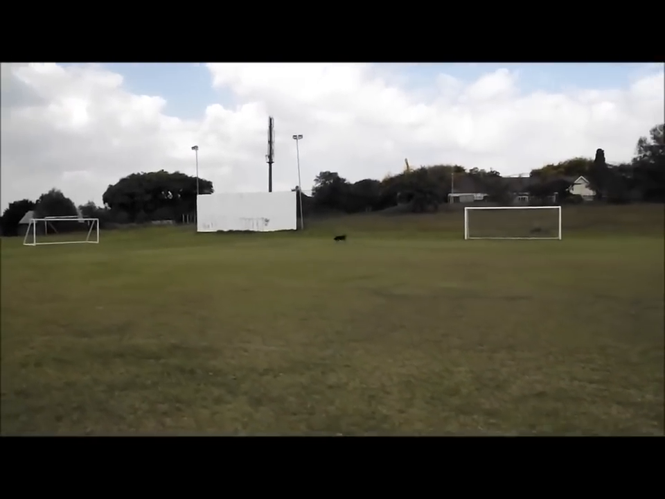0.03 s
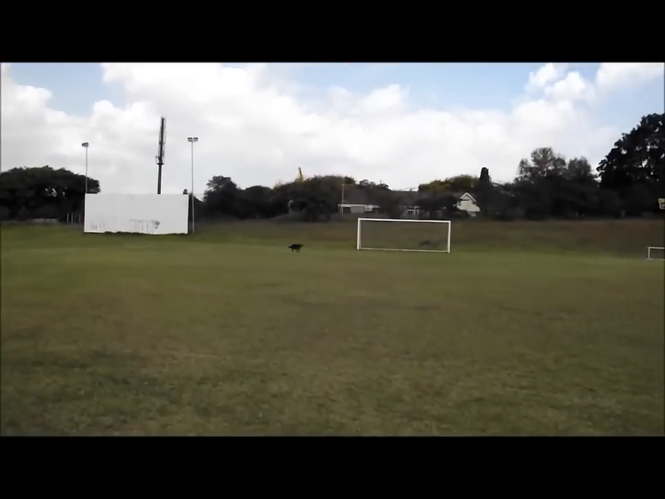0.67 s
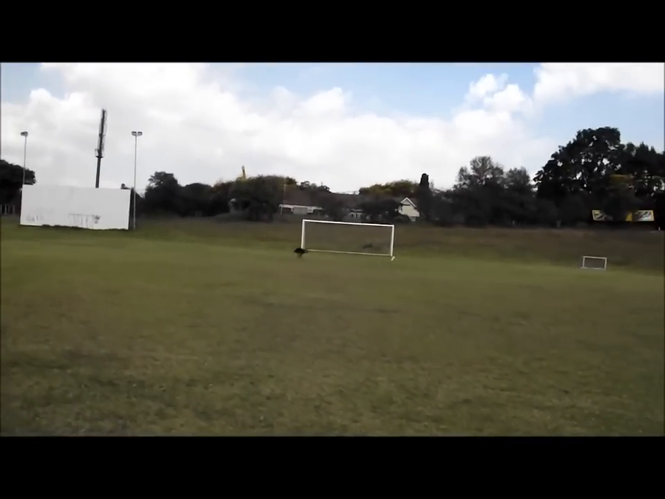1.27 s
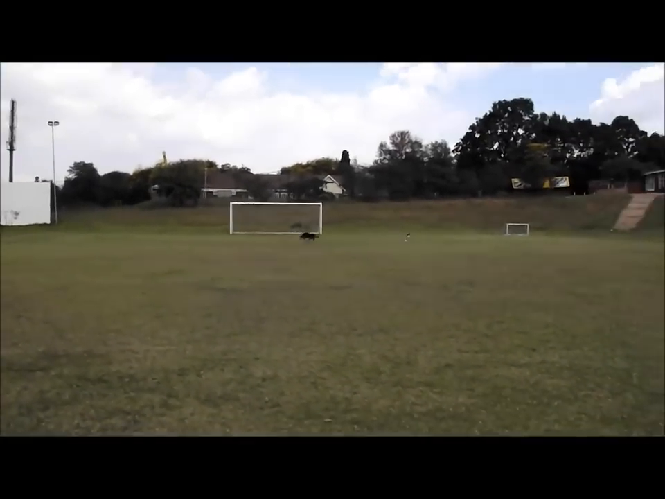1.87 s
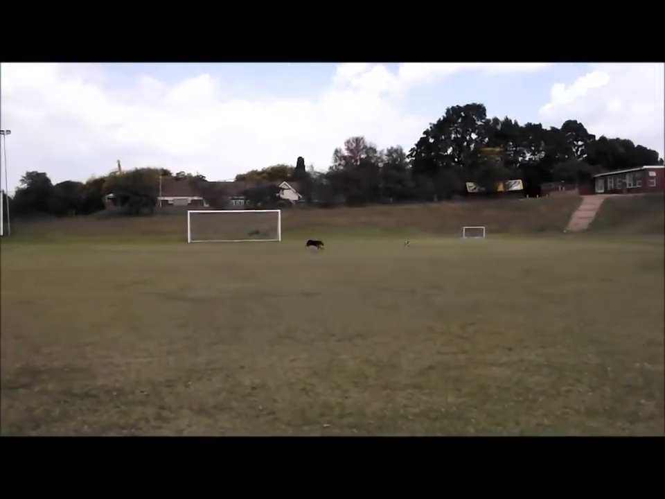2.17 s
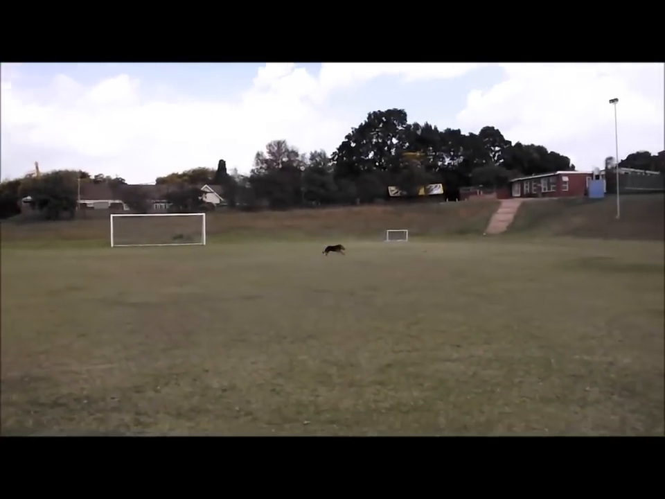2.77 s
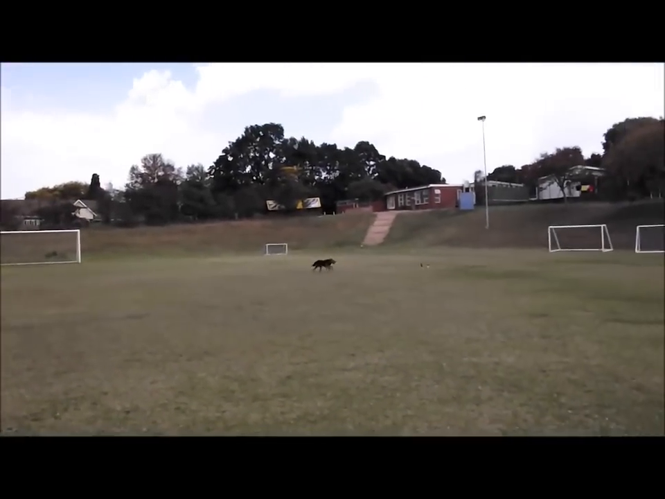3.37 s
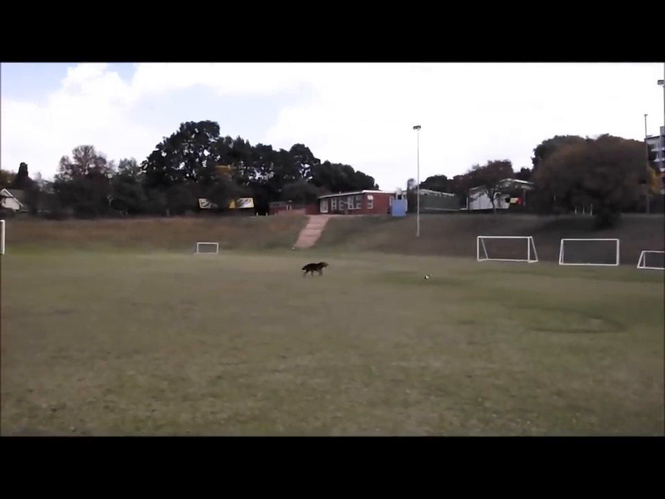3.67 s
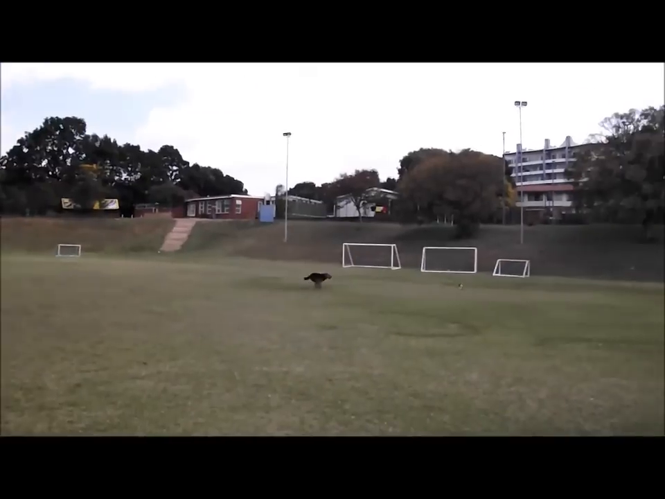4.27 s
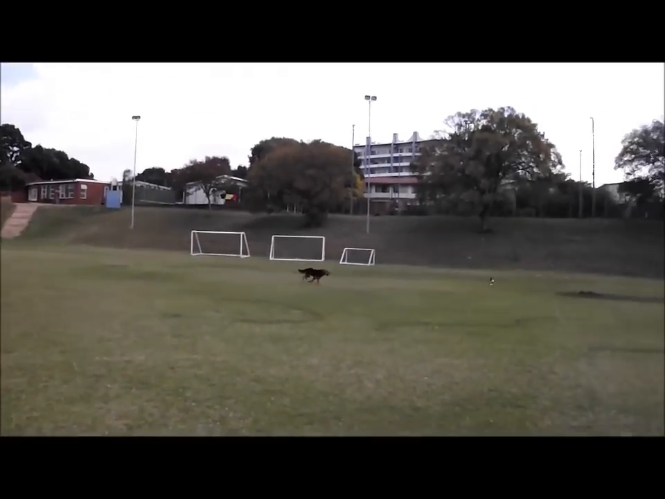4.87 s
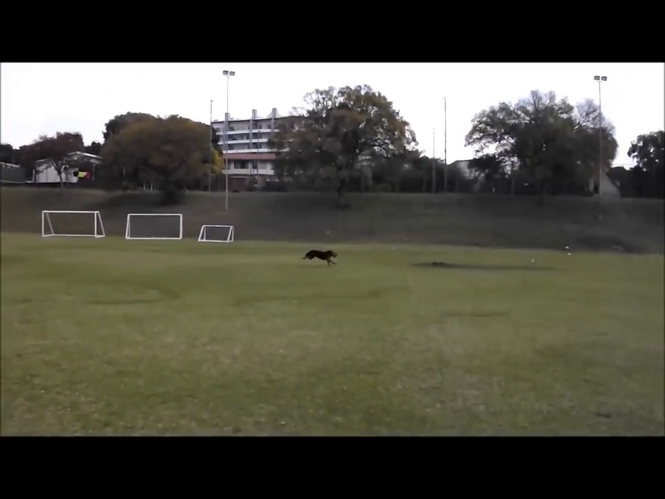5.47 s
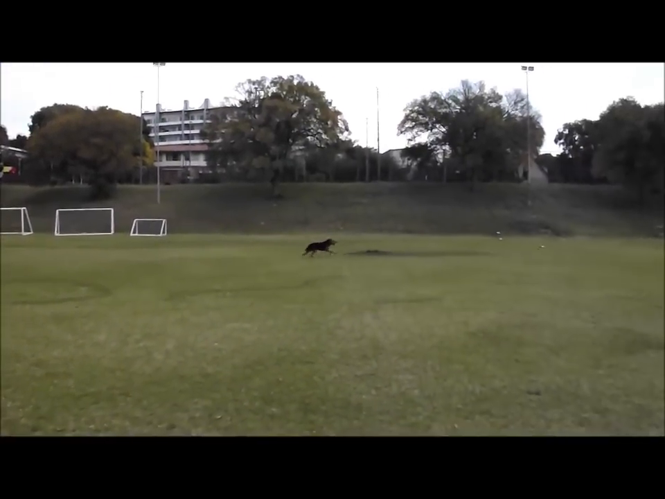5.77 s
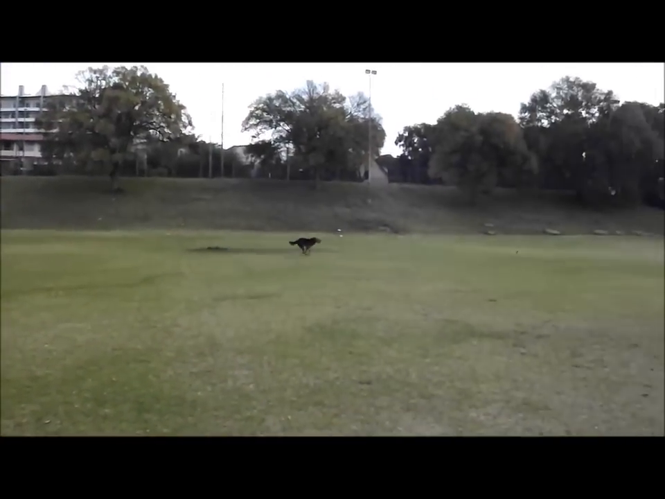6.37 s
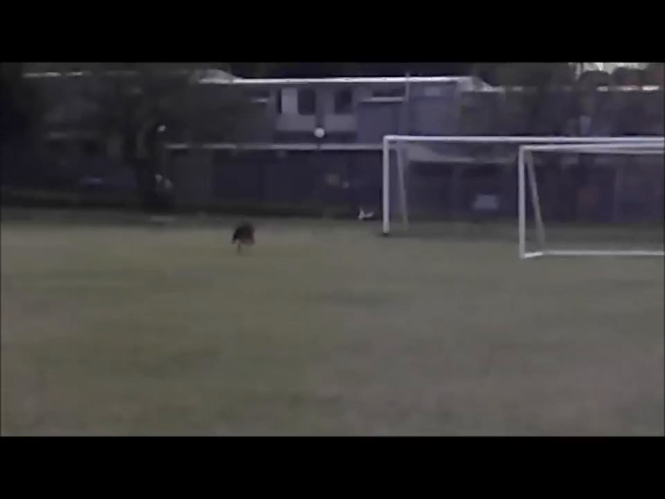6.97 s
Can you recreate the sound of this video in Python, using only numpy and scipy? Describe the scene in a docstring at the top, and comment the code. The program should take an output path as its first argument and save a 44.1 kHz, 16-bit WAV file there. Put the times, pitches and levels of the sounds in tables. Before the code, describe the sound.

Birds give shrill alarm calls across an open field, each a rising, stuttering rasp that snaps into a short, clean, falling note with a faint echo. One call comes at about 0.2 seconds, then two weak ones, then a quick run from 1.3 to 2.8 seconds. After a lull with one softer call, the scolding resumes at 3.7 seconds and continues, sometimes overlapping, to the end at about 7 seconds.

Wind rumbles on the microphone from the start, puffs hardest between 2 and 2.5 seconds, and dies down by about 4. Fingers knock on the camera between 0.7 and 4.1 seconds, among a few small dry ticks. The sound cuts out for an instant near 2.8 seconds. From about 3.5 seconds a distant engine hums low, wavering and throbbing. Soft air hiss and a very faint, high electronic whine lie underneath.

```python
"""An open playing field, where crowned lapwings scold a running dog (the dog is not heard).
The two sides of a bird's voice box clash in a rising, stuttering rasp, then lock into a short,
clean, falling note. Wind buffets the microphone, the air hisses and the camera's electronics whine.
Fingers knock on the camera, small ticks sound, and from about halfway a far engine hums."""
import sys
import numpy as np
from scipy import signal
from scipy.fft import rfft, irfft, next_fast_len
from scipy.io import wavfile
from scipy.ndimage import uniform_filter1d, map_coordinates

SR = 44100
rng = np.random.default_rng(int(sys.argv[2]) if len(sys.argv) > 2 else 0)


def bounce(signal):
    """Save signal as a 16-bit WAV file at the path given by the first command-line argument."""
    frames = np.transpose(np.atleast_2d(signal))
    limited = np.clip(frames, -1, 1)
    pcm = np.round(limited * 32767).astype(np.int16)
    wavfile.write(sys.argv[1], SR, pcm)


N = 314433
TIME = np.arange(N) / SR


def from_db(db):
    """Turn decibels into a number to multiply by."""
    return 10 ** (np.asarray(db) / 20)


def unit_power(x):
    """Scale a sound to an average power of 1."""
    return x / np.sqrt(np.mean(x ** 2) + 1e-20)


def in_time(rows):
    """Join rows that start with a time into one curve per remaining column."""
    s, *columns = np.transpose(rows)
    return [np.interp(TIME, s, c) for c in columns]


def coloured(x, spectrum):
    """Shape a sound's lows and highs along (Hz, dB) points."""
    hz, db = np.transpose(spectrum)
    size = next_fast_len(len(x) + 512)
    bins = np.maximum(np.arange(size // 2 + 1) * SR / size, 1)
    return irfft(rfft(x, size) * from_db(np.interp(np.log(bins), np.log(hz), db)), size)[:len(x)]


def wander(rate, size):
    """Drift around zero, heading for a new random value `rate` times a second."""
    knots = rng.standard_normal(4096)
    return np.interp(np.arange(size) * rate / SR, np.arange(len(knots)), knots)


def noise(spectrum):
    """Noise of power 1, shaped along (Hz, dB) points."""
    return unit_power(coloured(rng.standard_normal(N), spectrum))


def evened(x, window_s):
    """Even out the loudness, holding the power near 1."""
    return x / np.sqrt(np.abs(uniform_filter1d(x ** 2, max(int(window_s * SR), 2))) + 1e-9)


def ring(clicks, hz, t60):
    """Each click starts a tone that fades by 60 dB in t60 seconds."""
    r, w = from_db(-60 / (t60 * SR)), 2 * np.pi * hz / SR
    return signal.lfilter([0, np.sin(w)], [1, -2 * r * np.cos(w), r * r], clicks + 1e-18)


def die_away(clicks, t60):
    """A loudness curve that jumps at each click and fades by 60 dB in t60 seconds."""
    return signal.lfilter([1], [1, -from_db(-60 / (t60 * SR))], clicks + 1e-18)


def ramp(x):
    """Smooth step from 0 to 1."""
    return np.sin(np.pi / 2 * np.clip(x, 0, 1)) ** 2


def harmonics(phase, first, last):
    """A buzz of equally strong harmonics, staggered so their peaks do not pile up."""
    return sum(np.cos(k * phase + k * k) for k in range(first, last + 1))


# The wind dying down. Each row: time in seconds, relative rumble and flutter levels in dB.
WIND_LEVELS = [(0.0, -21.5, -31.5), (0.06, -14, -26), (0.08, -20.5, -27.5), (0.67, -19, -29),
               (0.69, -13, -21.5), (0.83, -21.5, -23.5), (1.31, -17.5, -36.5), (1.67, -20, -26.5),
               (1.97, -19.5, -33.5), (2.06, -14, -23), (2.66, -19, -32.5), (2.8, -28.5, -41),
               (3.22, -26.5, -39), (3.26, -16.5, -40), (3.45, -25.5, -40.5), (4.31, -37.5, -43),
               (7.09, -34, -42), (7.13, -41, -45)]
# Single puffs of air. Each row: time of the peak in seconds, level in dB.
PUFFS = [(2.05, -18), (2.225, -12.5), (2.34, -7.5), (2.46, -14), (3.266, -23)]
# The tone of rumble, flutter and puffs. Each row: frequency in Hz, relative level in dB.
RUMBLE_TONE = [(10,-10.5),(20,1.5),(35,3),(55,0.5),(80,-2.5),(110,-21),(160,-45),(300,-77)]
FLUTTER_TONE = [(50,-44),(90,-1),(120,0),(160,-8.5),(220,-14),(320,-29.5),(600,-36.5),(1500,-70)]
PUFF_TONE = [(15, 0), (40, 13), (70, 0.5), (130, -5), (250, -22.5), (600, -34), (1500, -61)]

def wind(eddy_db=2.0, eddies_per_s=14, puff_half_width_s=0.016):
    """Swirls of air rumble on the microphone, with a faster flutter and a few single puffs."""
    rumble_db, flutter_db = in_time(WIND_LEVELS)
    eddies = from_db(eddy_db * wander(eddies_per_s, N))
    rumble = from_db(rumble_db + 1.6) * evened(noise(RUMBLE_TONE), 0.117)
    flutter = from_db(flutter_db + 1.0) * evened(noise(FLUTTER_TONE), 0.098)
    puffs = sum(from_db(db) * np.exp(-((TIME - s) / puff_half_width_s) ** 2) for s, db in PUFFS)
    return eddies * (rumble + flutter) + puffs * evened(noise(PUFF_TONE), 0.038)


# How loud the air is. Each row: time in seconds, level in dB.
HISS_LEVEL = [(0,-38.5),(1.0,-41),(2.4,-41),(2.9,-40),(3.5,-41.5),(4.2,-42),(4.7,-45.5),(5.1,-44),(5.8,-41),(6.3,-41.5),(7.13,-42)]
# The tone of the air. Each row: frequency in Hz, relative level in dB.
HISS_TONE = [(100,-3),(300,0.5),(450,0),(700,2),(1100,2.5),(1700,-2.5),(2700,-1),(3400,-1),(4200,-2),(5000,-19),(6000,-19),(9000,-23),(16000,-31.5)]

def air_hiss():
    """The open air hisses softly."""
    return noise(HISS_TONE) * from_db(in_time(HISS_LEVEL)[0])


# The tones in the whine. Each row: frequency in Hz, relative level in dB.
WHINE_TONES = [(5200,-61.5),(6933,-72),(8667,-63),(10400,-60.5),(12133,-66.5),(13867,-61.5),(15000,-63.5),(15600,-62)]
# How the whine fades and returns. Each row: time in seconds, relative level in dB.
WHINE_SWELL = [(0,6.5),(2.6,5.5),(3.2,3),(4.2,-4),(4.8,-14),(5.4,0),(6.2,-3.5),(7.13,-4)]

def camera_whine():
    """The camera's electronics give off thin, high tones of steady pitch."""
    tones = sum(from_db(db) * np.sqrt(2) * np.sin(2 * np.pi * hz * TIME) for hz, db in WHINE_TONES)
    return tones * from_db(in_time(WHINE_SWELL)[0] - 6)


def softness(rise, growl_db):
    """How gently a call opens, 0 to 1: a big climb with little growl is gentlest."""
    return np.clip(rise / 0.16, 0, 1) * np.clip(growl_db / -22, 0, 1)


# The bird's throat as a call opens. Each row: frequency in Hz, relative level in dB.
OPENING_THROAT = [(1100, -34), (1700, -9), (2200, 0.5), (2700, 1), (3500, -5), (4300, -9.5), (5200, -25),
                  (8000, -46)]

def lead_in(row, early_s=0.014, lead_db=-14, overlap=0.64, jitter=0.0072, sag=0.0501):
    """Before the rasp takes hold, the voice box buzzes softly an octave down and glides up."""
    break_at, rasp_s, _, note_hz, rise, rasp_db, _, _, _, growl_db, _ = row
    start = break_at - rasp_s
    span = np.flatnonzero((TIME > start - early_s) & (TIME < start + overlap * rasp_s))
    since = TIME[span] - start
    climb = 1 - rise * (1 - np.clip(since / rasp_s, 0, 1)) ** np.sqrt(2)
    climb += sag * np.minimum(since / early_s, 0)
    pitch = note_hz / 2 * climb * (1 + jitter * wander(520, len(span)))
    buzz = unit_power(coloured(harmonics(2 * np.pi * np.cumsum(pitch) / SR, 2, 12), OPENING_THROAT))
    swell = np.sin(np.pi * np.linspace(0, 1, len(span))) ** 1.6
    out = np.zeros(N)
    out[span] = buzz * softness(rise, growl_db) * from_db(rasp_db + lead_db) * swell
    return out


def stutter(from_break, rasp_s, hoarse_db, speed_up=0.17, gap_share=0.43, settle_s=0.0032):
    """Depth of the gaps in the voice: uneven bursts speed up, then merge just after the break."""
    size = len(from_break)
    before, after = np.maximum(-from_break, 0), np.maximum(from_break, 0)
    last_period_s = 0.0055 + 0.036 * rasp_s
    beats = np.log1p(speed_up * before / last_period_s) / speed_up - after / last_period_s
    beats += 0.146 * wander(91.25, size)
    unsettled = np.exp(-after / (settle_s * from_db(hoarse_db)))
    depth = unsettled * np.clip(1 + 0.267 * wander(99, size), 0, 1.2)
    return depth * ramp(1 - np.abs((beats + 0.34) % 1 - .5) / gap_share)


def throat(third_db, treble_db, growl_db):
    """How the throat shapes the clean and the rough part of a call, as (Hz, dB) points."""
    high_db = -9 + 1.1 * treble_db
    clean = [(700, -66), (1400, max(-28, growl_db - 7)), (1950, growl_db / 3), (2300, 0.31),
             (2950, 2.7), (3700, third_db), (4350, third_db), (5000, treble_db), (5600, treble_db - 8),
             (6100, high_db - 2.5), (6800, high_db), (8200, high_db - 14), (15000, high_db - 33)]
    rough = [(1000, -42), (1500, growl_db - 0.5), (2100, growl_db), (2700, 0), (3100, 0.5), (3450, 6),
             (3850, 1), (4400, third_db - 4.5), (5100, treble_db - 1), (6000, high_db - 10.5),
             (7000, high_db - 0.5), (9000, high_db - 20), (15000, high_db - 13)]
    return clean, rough


def clash(note_hz, pitch, in_rasp, hoarse_db, rough_throat, beat_share=0.63, slip=0.065):
    """The voice box's second side beats below the pitch, slipping more as the effort grows."""
    size = len(pitch)
    beat_hz = note_hz * (beat_share + slip * in_rasp * wander(901.6, size))
    beat = np.cos(2 * np.pi * np.cumsum(beat_hz) / SR)
    grating = unit_power(beat * harmonics(2 * np.pi * note_hz * TIME[:size], 1, 7))
    breath = from_db(hoarse_db - 4.5) * rng.standard_normal(size)
    rough = coloured(from_db(1) * grating + breath, rough_throat)
    read_at = np.cumsum((pitch / note_hz) ** 0.9)   # makes the roughness glide with the pitch
    return evened(map_coordinates(rough, [read_at], mode="mirror"), 0.023)


def call(row, fall_share=0.155, gap_sag=0.085, gap_db=-7.5, release_s=0.014):
    """One call: the two sides of the voice box clash in bursts, then lock into one clean tone."""
    break_at, rasp_s, note_s, note_hz, rise, rasp_db, note_db, third_db, treble_db, growl_db, hoarse_db \
        = row
    size = SR // 3
    since = TIME[:size]
    from_break = since - rasp_s
    in_rasp = np.clip(since / rasp_s, 0, 1)   # progress from 0 to 1
    in_note = np.clip(from_break / note_s, 0, 1)
    rasping = 1 - ramp(from_break / 0.00067 + .5)   # 1 in the rasp, 0 in the note
    gap = stutter(from_break, rasp_s, hoarse_db)
    # pitch climbs with the pressure, sags in each gap, then falls; clear notes hold it longer
    climb = 1 - rise * (1 - in_rasp) ** np.sqrt(2)
    fall = 1 - fall_share * in_note ** (1.22 + 0.04 * abs(growl_db))
    jitter = (0.0084 + 0.019 * rasping) * from_db(hoarse_db / 2) * wander(594.5, size)
    pitch = note_hz * climb * fall * (1 - gap_sag * gap + jitter)
    clean_throat, rough_throat = throat(third_db, treble_db, growl_db)
    tone = harmonics(2 * np.pi * np.cumsum(pitch) / SR, 1, 11)
    clean = evened(coloured(tone, clean_throat), 0.0022)
    # roughness grows through the rasp and drops back in the note
    rough = clash(note_hz, pitch, in_rasp, hoarse_db, rough_throat)
    rough *= from_db(4 + hoarse_db / 2 - 7 * (1.5 - in_rasp))
    rough *= rasping + (1 - rasping) * from_db(hoarse_db - 14) * (1 - in_note / 2)
    voice = evened(clean * (1 - 0.75 * gap) + rough, 0.0024)
    # weak pressure at both ends dulls the sound
    slack = np.clip(1.3 * (1 - in_rasp) + .3 * rasping + in_note ** 4, 0, 1)
    mellow = coloured(voice, [(3300, 0), (4200, -7), (6500, -14), (12000, -28)])
    voice += slack * (mellow - voice)
    swell_db = rasp_db + 3.5 + 13 * np.sqrt(abs(rise)) * np.minimum(2 * in_rasp - 1.5, .3)
    fade_db = note_db - 5 * np.abs(in_note - 0.26)
    level_db = rasping * swell_db + (1 - rasping) * fade_db + gap_db * gap
    attack_s = 0.02 + 0.22 * rasp_s * softness(rise, growl_db)
    edges = ramp(since / attack_s) ** .5 * ramp((note_s - from_break) / release_s) ** 0.71
    return voice * from_db(level_db) * edges


# The calls. Each row: time of the break from rasp to note, rasp length and note length in seconds,
# note pitch in Hz, share of that pitch the rasp climbs, then relative levels in dB for the rasp,
# the note, the third harmonic, the treble, the low growl and the hoarseness.
CALLS = [(0.234, 0.18, 0.035, 1284, 0.22, -18, -13, -5.5, -20, -28, -2),
         (0.573, 0.042, 0.024, 1053, 0.12, -36.5, -35, 1, -18, -10, -10),
         (1.126, 0.058, 0.023, 1075, 0.16, -34, -31, -1, -8.5, -12, -8),
         (1.349, 0.071, 0.038, 1308, 0.24, -20.5, -18.5, 4, -1, -24, -2),
         (1.471, 0.11, 0.034, 1234, 0.19, -27.5, -28, 1, -8.5, -19, 5.5),
         (1.566, 0.065, 0.037, 1375, 0.23, -21, -16, 3, -2.5, -21, 0),
         (1.758, 0.064, 0.041, 1402, 0.33, -18, -15.5, 1, -2, -25, 1),
         (1.94, 0.049, 0.042, 1447, 0.19, -20.5, -16.5, 1, 0, -30, -2.5),
         (2.088, 0.056, 0.037, 1446, 0.19, -18.5, -15, 1, -0.5, -34, -2.5),
         (2.254, 0.059, 0.041, 1442, 0.19, -19.5, -16.5, 1.5, 1, -27, 3),
         (2.433, 0.065, 0.037, 1474, 0.22, -17.5, -12.5, 2, 0.5, -42, -3),
         (2.614, 0.067, 0.039, 1454, 0.17, -18.5, -14, 1.5, 0, -19.5, 1.5),
         (2.81, 0.071, 0.074, 1464, 0.26, -16, -15, -2, -4.5, -26, 1),
         (3.044, 0.16, 0.033, 1212, 0.18, -31.5, -25.5, 0, -19, -17.5, 1),
         (3.684, 0.095, 0.017, 1263, 0.1, -31, -34, 4, -14, -8, -6),
         (3.743, 0.067, 0.032, 1447, 0.19, -16, -12, -6.5, -11, -27, 5.5),
         (3.838, 0.12, 0.034, 1260, 0.14, -18.5, -10.5, 1, -13, -33, -5),
         (3.958, 0.079, 0.037, 1440, 0.2, -15, -12.5, -2, -7, -24, -1.5),
         (4.102, 0.095, 0.013, 1244, 0.13, -31, -34, 1, -25, -5, -10.5),
         (4.181, 0.082, 0.038, 1414, 0.18, -13.5, -12, -0.5, -8, -22.5, 0.5),
         (4.223, 0.026, 0.035, 1087, 0.05, -22, -19.5, -2, -32, -27, -8),
         (4.362, 0.066, 0.022, 1194, 0.02, -13.5, -15.5, -4.5, -22.5, -28, -5),
         (4.452, 0.071, 0.036, 1484, 0.2, -17.5, -14.5, -3.5, -10.5, -23, 1),
         (4.49, 0.11, 0.025, 1261, 0.14, -18, -12.5, -10, -18, -24, -15),
         (4.644, 0.065, 0.033, 1355, 0.03, -15.5, -8, -13.5, -15.5, -18.5, -5),
         (4.858, 0.1, 0.033, 1385, 0.26, -15, -12.5, -6.5, -12, -15, -5),
         (5.024, 0.07, 0.034, 1370, 0.38, -13.5, -12.5, -5.5, -12.5, -15, -8),
         (5.225, 0.09, 0.036, 1412, 0.26, -15, -11.5, 3, -7, -8.5, -2.5),
         (5.441, 0.1, 0.032, 1420, 0.24, -14, -13, 2, -5, -10.5, 0),
         (5.726, 0.15, 0.033, 1424, 0.29, -15, -12.5, -1, -5, -13.5, -1),
         (5.969, 0.11, 0.037, 1420, 0.35, -21.5, -14.5, -8.5, -14.5, -7.5, 1),
         (6.039, 0.048, 0.038, 1067, 0.14, -28.5, -25, -18, -24, -5.5, -17),
         (6.199, 0.088, 0.035, 1387, 0.19, -17, -13.5, 2, -10.5, -14, 0.5),
         (6.458, 0.116, 0.034, 1395, 0.24, -19, -17, -5, -6, -7, 1),
         (6.552, 0.079, 0.037, 1335, 0.16, -21.5, -19.5, -1.5, -10.5, -23, 5),
         (6.687, 0.11, 0.039, 1380, 0.41, -18.5, -11, -4.5, -14, -7.5, -13),
         (6.873, 0.085, 0.032, 1370, 0.27, -22.5, -19.5, -2, -9, -8.5, 3),
         (6.998, 0.11, 0.022, 1430, 0.24, -19.5, -11.5, -3, -7, -13.5, -7),
         (7.073, 0.086, 0.039, 1509, 0.26, -15.5, -11, 1, -6, -45, -13),
         (7.15, 0.082, 0.026, 1400, 0.14, -17.5, -15, 4, -11, -31, 2)]

def lapwings():
    """The birds scold, each call with its lead-in."""
    out = np.zeros(N + SR)
    for row in CALLS:
        sound = call(row)
        start = max(int((row[0] - row[1]) * SR), 0)
        out[start:start + len(sound)] += sound
        out[:N] += lead_in(row)
    return out[:N]


def field_echo(x, echo_db=-28, build_up_s=0.092, t60=1.4):
    """Banks, trees and buildings scatter a faint, dull echo."""
    t = TIME[:SR]
    scatter = rng.standard_normal(SR) * from_db(-60 * t / t60) * ramp(t / build_up_s)
    echo = signal.fftconvolve(x, scatter / np.linalg.norm(scatter))[:N]
    return from_db(echo_db) * coloured(echo, [(3000, 3.5), (4500, 0.5), (8000, -11)])


# Small dry ticks. Each row: start in seconds, relative level in dB.
DRY_TICKS = [(2.108,-12),(2.344,-9.5),(2.46,-9.5),(2.803,-32),(3.172,-31),(4.848,-15)]

def ticks(t60=0.0066, gain_db=-8, snap_db=-16):
    """Short bright ticks: a few on their own, and a snap as each call breaks into its note."""
    snaps = [(row[0], row[6] + snap_db) for row in CALLS]
    clicks = np.zeros(N + SR)
    for s, db in DRY_TICKS + snaps:
        clicks[round(s * SR)] = from_db(db + gain_db)
    return die_away(clicks[:N], t60) * noise([(300, -2.5), (3500, -5), (7000, -9.5), (16000, -20)])


# Finger knocks. Each row: start in seconds, relative level in dB, hardness of the contact in dB.
FINGER_KNOCKS = [(0.693, -15.5, -13), (1.476, -5, -13), (1.591, -28, -3), (1.74, -14.5, -14),
                 (1.855, -8.5, -12.5), (2.588, -6, -19.5), (2.883, -26, -25), (3.075, -26, -13),
                 (3.25, -24, -28), (3.372, -25.5, -14), (4.063, -6, -15)]
# The camera body's tones. Each row: frequency in Hz, relative level in dB, seconds to fade by 60 dB.
BODY_TONES = [(708,-18,0.15),(824,-5.5,0.087),(1030,2,0.053),(1263,-2.5,0.055),(1605,-11,0.035),(930,0.5,0.013),(2560,-8,0.0051),(3000,-8.5,0.032),(4950,-8.5,0.012)]

def knocks(low_cut_hz=480, body_db=-2.0, bounce_s=0.00351, bounce_db=-11, crack_t60=0.062):
    """Each knock and its small rebound ring the camera body; hard contacts add a crack."""
    body, cracks = np.zeros(N), np.zeros(N)
    s, db, hard_db = np.transpose(FINGER_KNOCKS)
    at = np.round(s * SR).astype(int)
    for k, (hz, tone_db, t60) in enumerate(BODY_TONES):
        clicks = np.zeros(N)
        clicks[at] = from_db(db + tone_db + body_db + rng.normal(0, 1.5, len(at)))
        clicks[at + int(bounce_s * SR)] = clicks[at] * from_db(bounce_db) * rng.standard_normal(len(at))
        body += (-1) ** k * ring(clicks, hz, t60)
    body = signal.sosfilt(signal.butter(2, low_cut_hz, "high", fs=SR, output="sos"), body)
    cracks[at] = from_db(db + hard_db)
    crack_tone = [(200, -20), (420, -3), (560, 15), (1050, 7.5), (3000, -11), (5000, -3),
                  (7000, -11.5), (16000, -56)]
    return body + die_away(cracks, crack_t60) * noise(crack_tone)


# The engine's hum. Each row: time in seconds, pitch in Hz, level in dB.
ENGINE_HUM = [(0,74,-74),(3.1,79.5,-70),(3.5,73.9,-35.5),(4.0,71.8,-29.5),(4.6,72.67,-31),(5.2,75.8,-28.5),(5.5,76.2,-35),(5.9,77.9,-36),(6.25,78,-31),(6.45,74.54,-43),(7.13,72,-38.5)]

def far_engine(waver=0.024, throb_db=2.5):
    """A far engine hums one low tone that wavers and throbs."""
    hz, db = in_time(ENGINE_HUM)
    phase = 2 * np.pi * np.cumsum(hz * (1 + waver * wander(6.3, N))) / SR
    return np.sqrt(2) * np.sin(phase) * from_db(db + throb_db * wander(12, N))


def scene():
    """Mix the birds, their echo and the sounds around them into one channel."""
    birds = lapwings()
    mix = birds + field_echo(birds) + knocks() + ticks() + wind()
    return (mix + far_engine() + camera_whine() + air_hiss())[None]


def record(dry, dropout_s=(2.8255, 2.858), dropout_db=-46, cutoff_hz=15900):
    """Peaks are clipped, the sound cuts out for an instant, and the highest treble is removed."""
    live = (TIME < dropout_s[0]) | (TIME > dropout_s[1])
    out = np.clip(dry, -1, 1) * np.where(live, 1, from_db(dropout_db))
    return signal.sosfilt(signal.ellip(10, .1, 90, cutoff_hz, fs=SR, output="sos"), out)


dry = scene()
out = record(dry)
bounce(out)
```